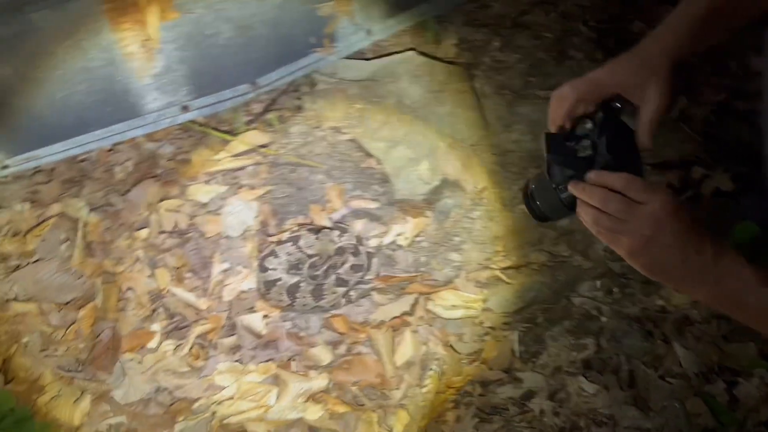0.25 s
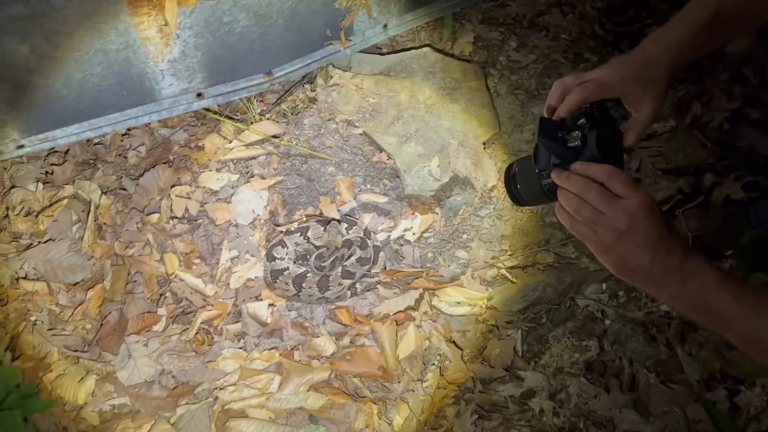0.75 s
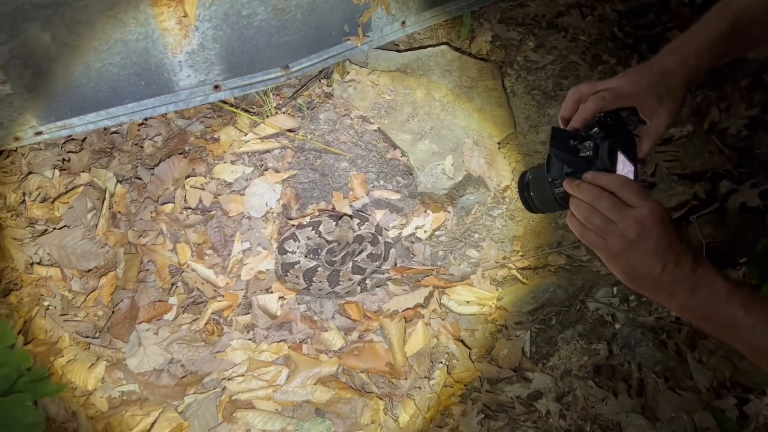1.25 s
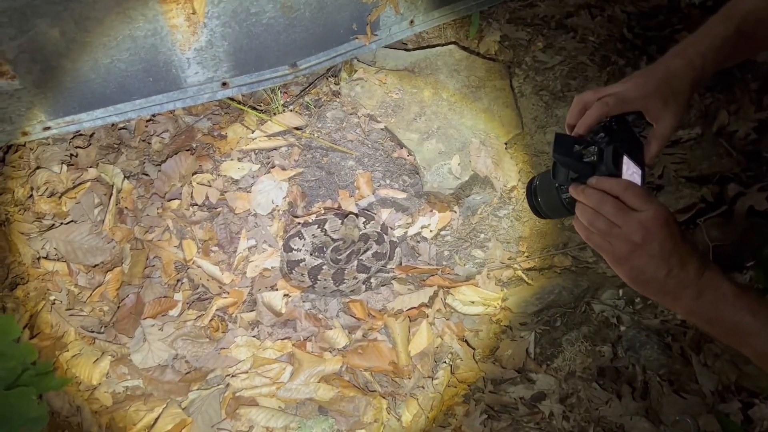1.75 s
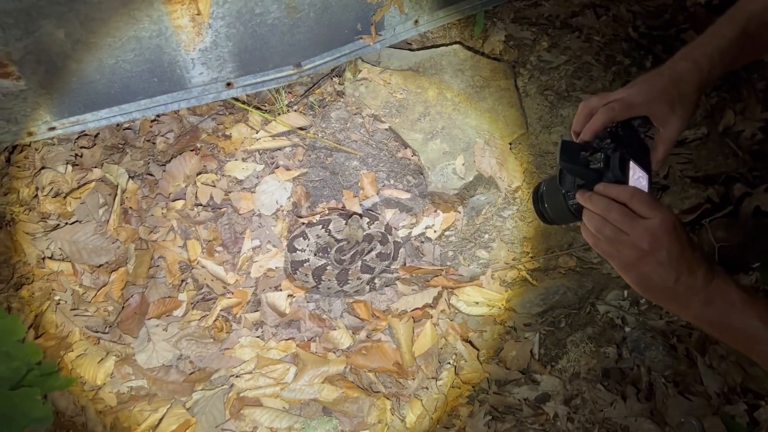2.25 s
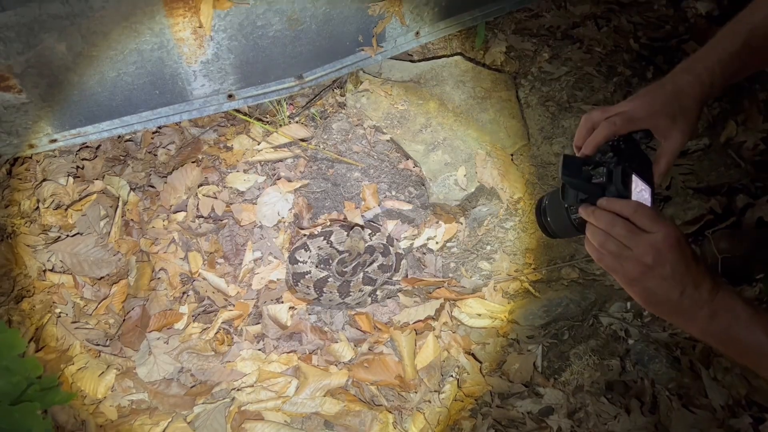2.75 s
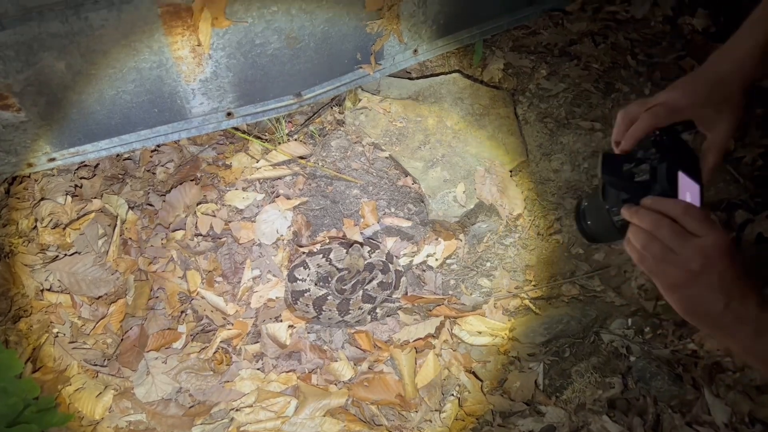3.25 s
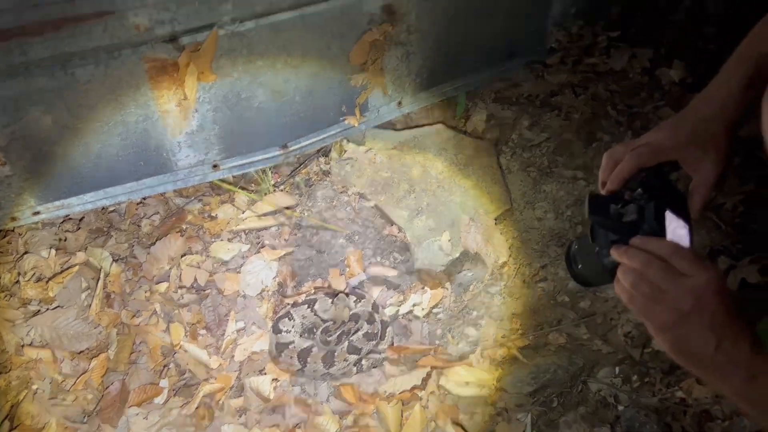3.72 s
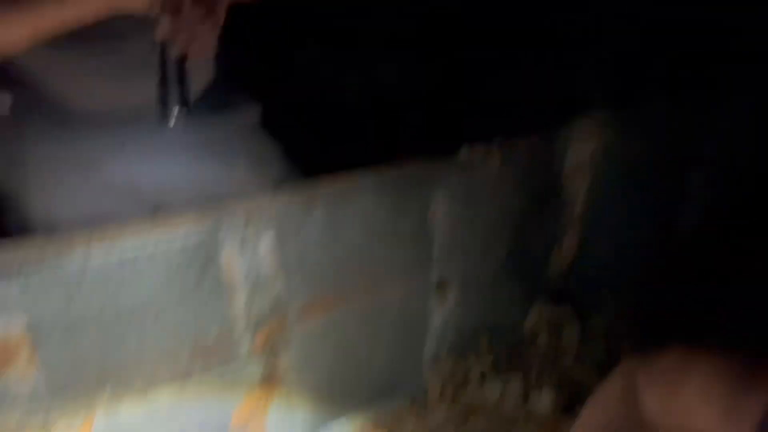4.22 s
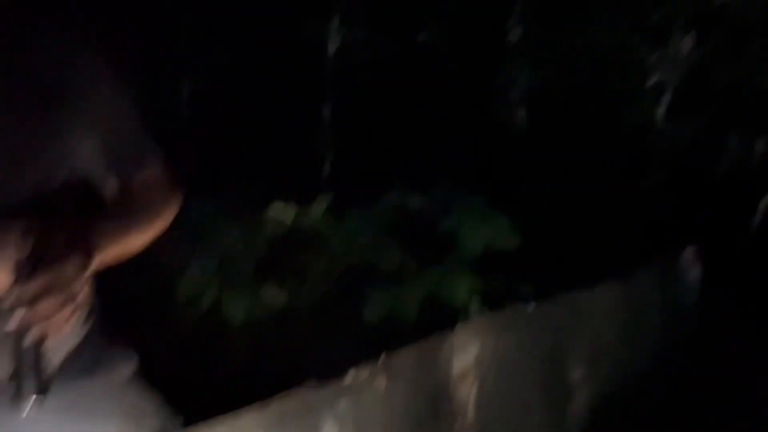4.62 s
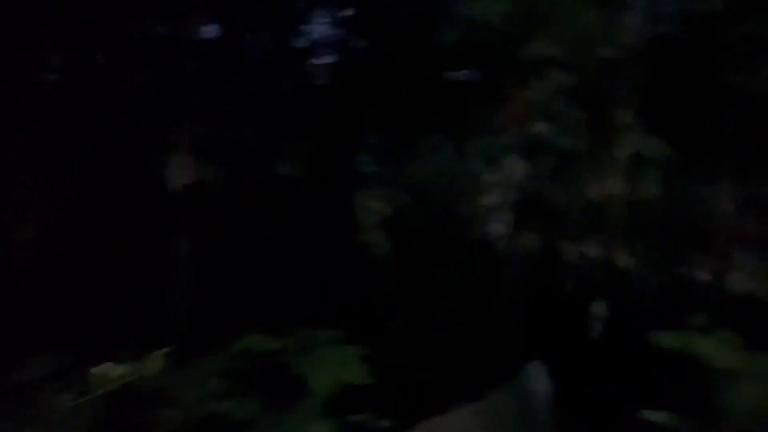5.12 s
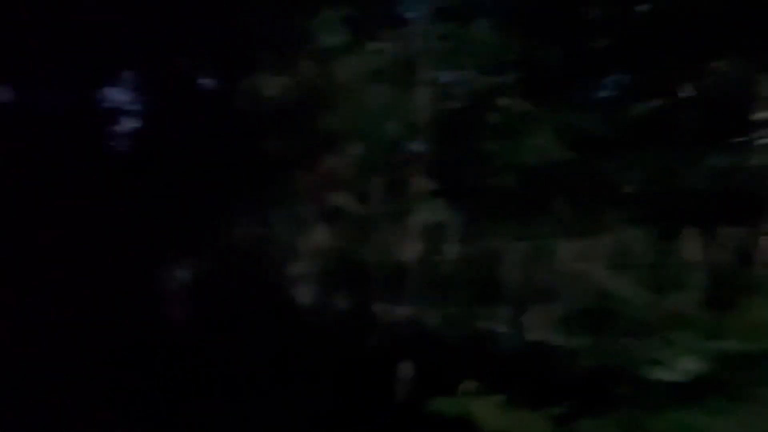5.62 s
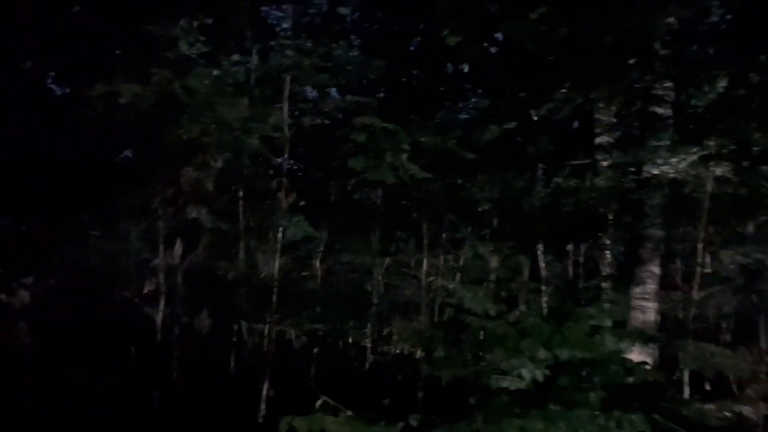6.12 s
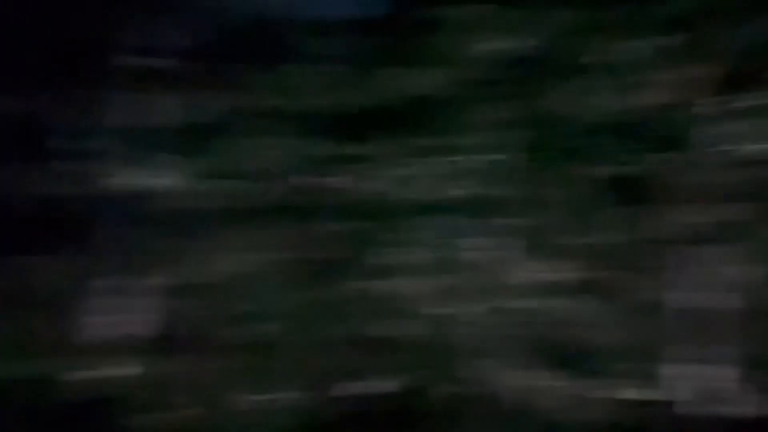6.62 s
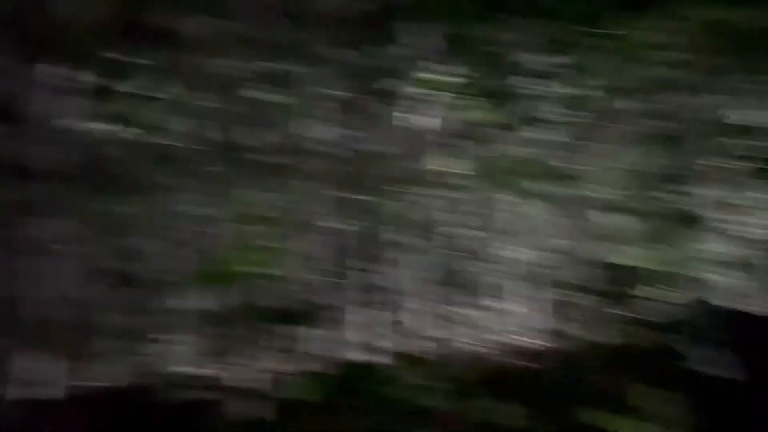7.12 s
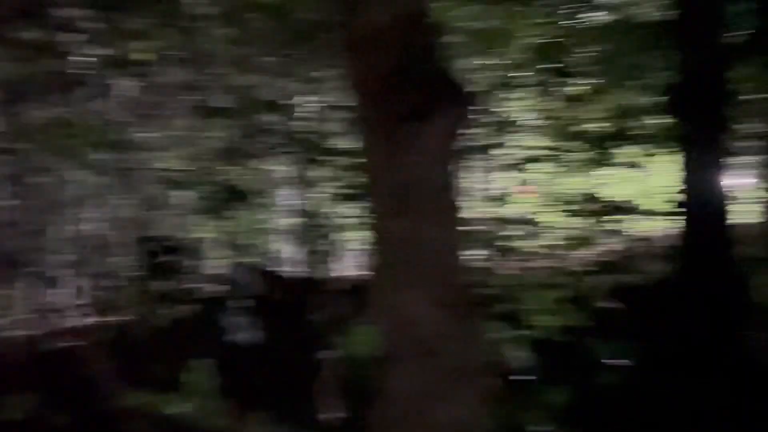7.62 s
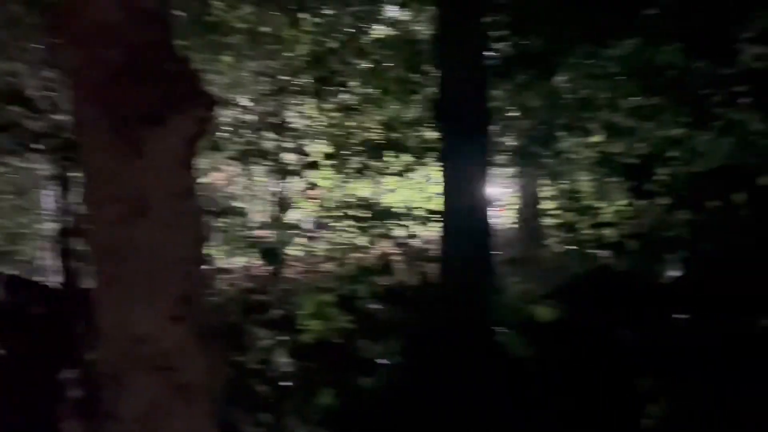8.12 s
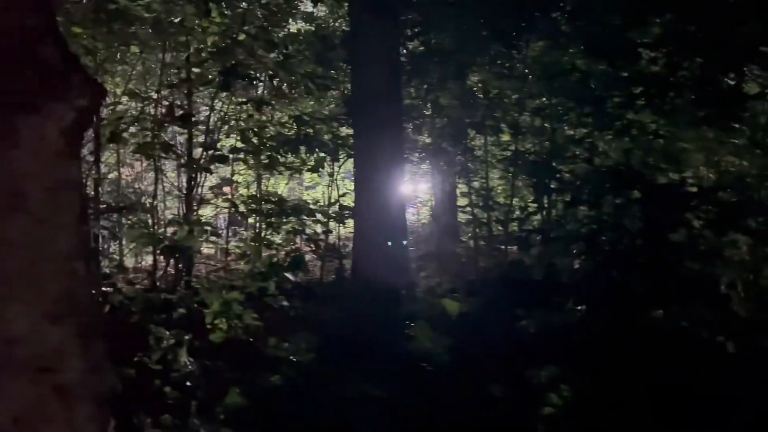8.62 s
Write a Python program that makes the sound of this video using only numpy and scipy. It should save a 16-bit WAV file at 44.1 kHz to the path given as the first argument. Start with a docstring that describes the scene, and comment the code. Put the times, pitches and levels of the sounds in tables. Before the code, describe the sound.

A rattlesnake shakes its tail in dry leaves, making a continuous, high, hissing buzz close to a hand-held microphone. About halfway through, the microphone turns away into the night woods, and the rattle shifts in tone and grows fainter without stopping. A distant engine idles with a low hum throughout. Faint wind brushes the microphone, and the plastic grip gives small creaks, mostly near the end.

```python
"""Rattlesnake at night

A rattlesnake buzzes in dry leaves below a hand-held camera, which turns away into the woods.
Its hollow tail segments clatter fifty times a second, and the colour at the two microphone ports
shifts with the turn. A far engine idles, light wind brushes the microphone, the plastic grip creaks."""
import sys
import numpy as np
from scipy import signal
from scipy.fft import rfft, irfft, next_fast_len
from scipy.io import wavfile
from scipy.ndimage import uniform_filter1d

SR = 44100
rng = np.random.default_rng(int(sys.argv[2]) if len(sys.argv) > 2 else 0)


def master(y):
    """Save y as 16-bit WAV."""
    cut = np.clip(np.atleast_2d(y).T, -1, 1)
    pcm = np.round(cut * 32767)  # scale
    wavfile.write(sys.argv[1], SR, pcm.astype(np.int16))


N = 390726


def amp(db):
    return 10 ** (np.asarray(db) / 20)


def unit_rms(x):
    return x / np.sqrt(np.mean(x ** 2) + 1e-20)


def at_hz(rows, hz):
    """Columns of a spectrum table, interpolated in log frequency."""
    row_hz, *columns = np.transpose(rows)
    return np.array([np.interp(np.log(hz + 1), np.log(row_hz + 1), c) for c in columns])


def at_time(rows, t):
    """Columns of a control table at times t."""
    row_s, *columns = np.transpose(rows)
    return [np.interp(t, row_s, c) for c in columns]


def stft(x, size):
    return signal.stft(x, SR, nperseg=size, noverlap=size * 3 // 4)


def istft(z, size):
    return signal.istft(z, SR, nperseg=size, noverlap=size * 3 // 4)[1][..., :N]


def drift(cutoff_hz):
    """Slow random wander, rms 1."""
    z = rfft(rng.standard_normal(N))
    hz = np.arange(len(z)) * SR / N
    return unit_rms(irfft(z / (1 + (hz / cutoff_hz) ** 4), N))


def patches(shape, bins, steps):
    """Random hills over frequency and time, rms 1."""
    hills = uniform_filter1d(rng.standard_normal(shape[::-1]).T, size=bins, axis=0)
    return unit_rms(uniform_filter1d(hills, size=steps, axis=1))


def ports(z, balance_db, lead_rad, coherence):
    """Stereo from two unrelated spectra: the right port shares part of the left."""
    coherence = np.clip(coherence, 0, 1)
    right = coherence * np.exp(1j * lead_rad) * z[0] + np.sqrt(1 - coherence ** 2) * z[1]
    return np.array([z[0], right / amp(balance_db)])


def camera_turn(t):
    """The hand swings the camera through five sides: 0 facing the snake, 4 turned away."""
    # Each row: start in seconds, length in seconds.
    swings = [(3.75, 0.52), (5.05, 0.51), (6.208, 0.66), (7.3, 0.51)]
    return sum(np.clip((t - start_s) / length_s, 0, 1) for start_s, length_s in swings)


def at_turn(per_side, turn):
    return np.interp(turn, range(len(per_side)), per_side)


def tail_clatter():
    """Dense dry clicks, loudest where segment knocks on segment; two unrelated click streams that share the
    same throb."""
    # Each row: time in seconds, shakes per second.
    shake_rate = [(0, 49.98), (1.75, 49.82), (3.85, 50.12), (4.9, 49.96), (6.15, 50.15), (7.7, 49.98),
                  (8.86, 49.98)]
    # Each row: place and spread as shares of a shake, centre in Hz, width in octaves, level in dB.
    knocks = [(0.079, 0.042, 3730, 0.11, 6), (0.73, 0.021, 4500, 0.12, 6.5), (0.22, 0.032, 5600, 0.073, 6),
              (0.074, 0.095, 8600, 0.28, 3), (0, 0.073, 9800, 0.062, 4), (0.35, 0.07, 14000, 0.25, 1.5),
              (0, 0.065, 12000, 0.075, 2), (.97, .1, 23000, 0.22, -6), (0.84, 0.11, 2550, 0.62, 0.5),
              (1, 0.16, 8700, 2.7, -4.5)]
    # Knock gain in dB for each side: echoes from the trees blur the throb.
    blur_db = [-0.25, 0.36, -0.47, -0.59, -2.5]
    clicks_per_s, click_spread_db, knock_spread_db, shell_t60_s = 12000, 1.5, 1.8, 0.0051
    hits = rng.random((2, N)) < clicks_per_s / SR
    sizes = np.minimum(rng.exponential(1, (2, N)), 4)
    clicks = hits * amp(click_spread_db * sizes) * rng.choice([-1, 1], (2, N))
    shell = rng.standard_normal((2, 300)) * amp(-60 * np.arange(300) / SR / shell_t60_s)
    n_fft = next_fast_len(N)
    smear = np.exp(1j * np.angle(rfft(shell, n_fft)))  # all-pass: spreads each click in time
    clicks = irfft(rfft(clicks, n_fft) * smear, n_fft)[:, :N]
    hz, t, z = stft(unit_rms(clicks), size=128)
    shakes = np.cumsum(at_time(shake_rate, t)[0]) * t[1]
    blur = amp(2 * at_turn(blur_db, camera_turn(t)))
    power = np.ones(z.shape[1:])
    scatter = rng.standard_normal((int(shakes[-1]) + 3, len(knocks), 2))  # no two shakes alike
    for k, (place, spread, centre_hz, width_oct, db) in enumerate(knocks):
        count = np.floor(shakes - place + .5).astype(int) + 1
        force, jitter = scatter[count, k].T
        offset = shakes - place + 1 - count + 0.046 * jitter
        pulse = amp(2 * (db + knock_spread_db * force)) * np.exp(-.5 * (offset / spread) ** 2)
        band = np.exp(-.5 * (np.log2((hz + 1) / centre_hz) / width_oct) ** 2)
        power += band[:, None] * pulse * blur
    return istft(z * np.sqrt(power / power.mean(1, keepdims=True)), size=128)


def rattle():
    """The tail's clatter and its echoes at the two ports of the turning camera."""
    # Each row: time in seconds, body level in dB, lean to the left in dB, treble level in dB.
    levels = [(0, -42.5, 4.5, -44), (3.7, -42.5, 4, -44.5), (3.95, -42, 2, -44.5), (4.25, -42.5, -0.5, -47),
              (4.7, -45.5, 4.5, -49), (5.05, -46.5, 3.5, -49), (5.45, -48.5, 3.8, -52),
              (5.9, -50, 1.5, -53), (6.3, -49, 5.5, -54.5), (6.5, -48, 9, -56.5), (6.85, -44.5, 9, -60.9),
              (7.15, -45.9, 7, -62), (7.65, -53.2, 7, -64), (7.85, -51.5, 6, -64.5), (8, -55, 2.5, -63),
              (8.86, -53.5, 4, -63.5)]
    # Body colour from five sides. Each row: frequency in Hz, left gain in dB, left over right in dB,
    # right lead in radians, coherence 0-1.
    front = [(1500, -22.9, 5.5, -0.04, 0.53), (2200, -18.6, 9.4, -1.1, 0.52),
             (3000, -11.7, 12.2, -1.5, 0.35), (3400, -5.4, 6.5, -0.22, 0.76), (3850, 2.2, 3.7, 0.01, 0.95),
             (4300, 1.7, 5.2, -0.01, 0.94), (4700, 1.5, 2.9, -0.0, 0.94), (4980, -6.7, 1.4, 0.01, 0.91),
             (5300, -0.6, 2.1, 0.28, 0.85), (5780, 2.8, 7.2, 0.79, 0.81), (6200, -0.8, 9.1, 1.69, 0.58),
             (6600, 0.3, 8.9, -0.52, 0.74), (7000, -1.5, 0.6, -0.05, 0.95), (7400, -3.7, 0.0, -0.0, 1.0)]
    quarter = [(1500, -22.4, 6.3, -1.9, 0.3), (2200, -18.6, 9.7, 0.4, 0.25), (2750, -15.2, 4.6, -0.1, 0.67),
               (3150, -7.9, 4.0, -0.6, 0.78), (3500, -2.2, 5.6, -0.4, 0.8), (3850, 1.5, 5.7, -0.5, 0.78),
               (4200, 3.6, 5.5, -0.5, 0.78), (4550, 2.7, 4.2, -0.7, 0.75), (4900, -1.1, 1.3, -0.3, 0.65),
               (5300, -5.3, -0.7, 0.2, 0.55), (5750, -3.0, 0.5, 1.0, 0.53), (6200, -4.1, 1.1, 0.8, 0.53),
               (6700, -2.4, 2.2, -0.0, 0.91), (7300, -3.3, 0.0, -0.0, 1.0)]
    side_on = [(1500, -19.1, 8.6, 3.1, 0.24), (2200, -16.7, 15.4, 0.1, 0.29), (2750, -15.7, 2.8, -0.2, 0.5),
               (3150, -10.1, 5.2, -2.4, 0.52), (3500, -4.7, 5.9, -1.9, 0.62), (3850, -2.4, 3.1, -1.4, 0.68),
               (4200, -4.0, -1.9, -1.4, 0.63), (4550, -5.7, -2.3, -0.1, 0.45), (4900, 0.1, 2.7, 0.5, 0.68),
               (5300, -0.8, 3.7, 1.0, 0.6), (5750, 2.6, 7.9, 1.6, 0.59), (6200, 3.2, 8.0, 1.5, 0.68),
               (6700, -0.7, 6.7, -0.2, 0.57), (7300, -2.2, 0.2, -0.1, 0.98)]
    back = [(1500, -23.2, 9.4, 2.9, 0.25), (2200, -34.4, -7.6, -2.6, 0.5), (2750, -30.3, -7.9, -2.6, 0.26),
            (3150, -19.6, -3.5, 0.2, 0.36), (3500, -7.7, 1.7, 0.2, 0.76), (3850, -2.1, 6.0, 0.0, 0.73),
            (4200, 2.5, 9.3, -0.1, 0.77), (4550, 1.4, 10.6, -0.2, 0.78), (4900, 1.6, 11.4, -0.2, 0.68),
            (5300, 0.9, 11.5, -0.6, 0.4), (5750, -2.0, 8.9, -1.0, 0.43), (6200, -4.0, 4.6, -1.1, 0.53),
            (6700, -9.7, 1.1, -2.4, 0.36), (7300, -13.7, -2.3, 0.1, 0.47)]
    behind = [(1500, -14.5, 2.9, -0.7, 0.19), (2200, -27.7, -5.4, -1.0, 0.33),
              (2750, -20.3, -1.9, -2.5, 0.55), (3150, -12.8, -0.8, -2.1, 0.43),
              (3500, -7.5, 1.8, -0.3, 0.13), (3850, -2.7, 3.0, -0.1, 0.42), (4200, 0.0, 5.6, -0.1, 0.5),
              (4550, 1.8, 6.6, -0.1, 0.66), (4900, 2.8, 6.8, -0.0, 0.62), (5300, 1.1, 6.8, 0.0, 0.56),
              (5750, -1.7, 5.9, 0.5, 0.24), (6200, -3.4, 2.5, 1.3, 0.14), (6700, -7.4, 1.5, -0.1, 0.28),
              (7300, -10.8, 0.0, -0.0, 0.94)]
    sides = [front, quarter, side_on, back, behind]
    # Pitch offset of the peaks in octaves for each side.
    side_oct = [0, .06, .07, -.2, -.1]
    # Each row: frequency in Hz, treble ripple in dB.
    treble_ripple = [(7000, 1.2), (7600, 0.2), (8200, 1.0), (8800, -2.1), (9200, -1.5), (9800, -2.7),
                     (10400, 0.5), (10900, -0.2), (11400, -2.3), (12000, -3.7), (12500, 0.6), (13800, 3.0),
                     (14700, 0.2), (15700, -1.4)]
    # The treble bands are by turns in step and opposed between the two channels. Each row: frequency in Hz,
    # right lead in half turns.
    twist = [(7900, 0), (9000, 1), (10050, 1), (11100, 2), (11900, 2), (13100, 3), (13850, 3), (14800, 4)]
    notch_hz, notch_width_hz, notch_db = 4960, 60, -7
    crossover_hz, min_treble_coherence, ground_gain = 7200, 0.09, 0.2

    hz, t, z = stft(tail_clatter(), size=1024)
    core = (hz > 3500) & (hz < 6500)
    hz = hz[:, None]
    body_db, lean_db, treble_db = at_time(levels, t)
    turn = camera_turn(t)
    # neighbouring sides blend, their peaks sliding in pitch
    slide_oct = at_turn(side_oct, turn)
    low_db, balance_db, lead_rad, low_coherence = sum(
        np.maximum(1 - abs(turn - k), 0) * at_hz(side, hz * 2 ** (side_oct[k] - slide_oct))
        for k, side in enumerate(sides))
    low_db += body_db - 12 * np.maximum(np.log2(1400 / (hz + 1)), 0)
    # an echo off sheet metal cancels one narrow band while the camera faces it
    facing = np.maximum(1 - 2 * turn, 0)
    low_db += notch_db * np.exp(-((hz - notch_hz) / notch_width_hz) ** 2) * facing
    lean_band = np.exp(-(np.log2((hz + 1) / 4800) / .5) ** 4)
    balance_db += (lean_db - balance_db[core].mean(0)) * lean_band

    ripple_db = at_hz(treble_ripple, hz)[0] * at_turn([1, .6, .4, .3, .3], turn)
    tilt_db_per_oct = at_turn([0, -3, -4.5, -3.5, -2.5], turn)
    high_db = treble_db + ripple_db + np.log2((hz + 1) / 11000) * tilt_db_per_oct
    twist_rad = np.pi * np.interp(hz, *np.transpose(twist))
    high_coherence = 1 - (1 - min_treble_coherence) * np.sin(twist_rad) ** 2
    high = np.clip((hz - crossover_hz) / 400 + .5, 0, 1)
    low = 1 - high

    # echoes off leaves and sheet metal comb thin, drifting streaks; the ground echo ripples evenly
    comb_db = 2.2 * patches(z.shape[1:], bins=2, steps=240)
    comb_db += 1.2 * patches(z.shape[1:], bins=8, steps=8)
    ground_delay_s = at_turn([0.0022, 0.001583, 0.00145, 0.0019, 0.00202], turn)
    comb_db += 20 * np.log10(abs(1 + ground_gain * low * np.exp(2j * np.pi * hz * ground_delay_s)))
    z = ports(z, low * balance_db, low * lead_rad + twist_rad, low * low_coherence + high * high_coherence)
    z *= amp(low * low_db + high * high_db) * unit_rms(amp(comb_db))
    return istft(z * np.sqrt(SR / 2000), size=1024)  # levels per kHz


def engine():
    """A far engine hunts around idle; through the trees its low orders waver differently at each port."""
    # Each row: time in seconds, firings per second.
    idle = [(0, 16.82), (.4, 16.47), (.76, 16.73), (1.1, 16.38), (1.72, 16.87), (2.05, 16.35),
            (2.78, 16.53), (3.04, 16.41), (3.4, 16.75), (3.8, 16.87), (4.3, 16.37), (4.7, 16.48),
            (5.6, 16.66), (6.3, 16.75), (7.09, 16.44), (7.4, 16.74), (7.85, 16.38), (8.5, 16.67),
            (8.86, 16.66)]
    # Each row: multiple of the firing rate, level in dB, phase in radians, waver in dB,
    # gain in dB per extra firing per second.
    orders = [(2, -63.5, 0, -1, 0), (3, -61.5, 0, 4, 5), (4, -49, 0, 1.1, -3.5), (5, -51.5, 0.29, 0.5, 7.5),
              (6, -64.5, -1.07, 1, 12), (7, -85, 3.5, 5, -2), (8, -85, -0.3, 3.6, 11),
              (10, -73.5, 2.5, 3, 9)]
    start_cycles = 0.93
    firing_hz = at_time(idle, np.arange(N) / SR)[0]
    angle = 2 * np.pi * (start_cycles + np.cumsum(firing_hz) / SR)
    out = np.zeros((2, N))
    for multiple, db, phase_rad, waver_db, db_per_hz in orders:
        sway_rad = 0.25 * drift(1.0)
        swell_db = waver_db * drift(2.3) + db_per_hz * (firing_hz - firing_hz.mean())
        lean_db = -5.5 + 2.5 * drift(2.7)
        for port, sign in enumerate((1, -1)):
            tone = np.sqrt(2) * np.cos(multiple * angle + phase_rad + sign * sway_rad)
            out[port] += amp(db + swell_db + sign * lean_db / 2) * tone
    return out


def night_air():
    """Low rumble and faint hiss in drifting patches, with a midrange rustle that swells and fades."""
    # Each row: frequency in Hz, noise density in dB, left over right in dB, coherence 0-1.
    spectrum = [(20, -92, 12, .7), (45, -75.5, 6, 0.4), (77, -69, 0.5, 0.8), (107.5, -80, 1, 0.63),
                (179, -92.5, -4, 0.86), (270, -106, 16, 0.2), (694, -106, -3, 0.08), (1100, -102, -2, 0),
                (1270, -100, -1.5, 0.3), (1580, -102, 5, 0.2), (2420, -103, -0.5, 0.56),
                (4000, -104, -4, 0), (6470, -110, 10, 0.1), (7500, -140, -10, .1)]
    # Each row: time in seconds, midrange gain in dB.
    rustle = [(0, 7), (.4, -6.5), (3.6, -6), (4.2, 4), (4.6, -2), (7.2, -3.5), (7.5, 3), (8, 2.5),
              (8.86, -11)]
    port_delay_s = 0.00019  # far sounds reach the right port later
    hz, t, z = stft(rng.standard_normal((2, N)), size=2048)
    hz = hz[:, None]
    db, balance_db, coherence = at_hz(spectrum, hz)
    midrange = np.exp(-(np.log2((hz + 1) / 800) / 0.64) ** 2)
    db = db + at_time(rustle, t)[0] * midrange + 2.5 * patches(z.shape[1:], bins=10, steps=8)
    z = ports(z, balance_db, -2 * np.pi * hz * port_delay_s, coherence)
    return istft(z * amp(db) * np.sqrt(SR / 2), size=2048)


def wind():
    """Gusts moan on the microphone: each rises, holds and drops back to the lull, fluttering all along."""
    # Each row: start in seconds, length in seconds, level in dB, moan pitch in Hz.
    gusts = [(.15, 0.37, -74.5, 333), (.95, 0.53, -75.5, 328), (1.565, 0.45, -74, 325),
             (1.95, 0.36, -74.5, 430), (2.673, 0.063, -60, 300), (2.833, 0.33, -76.5, 320),
             (3.348, 0.62, -70.5, 310), (4.024, 0.316, -69, 363), (4.688, 0.36, -74.5, 350),
             (5.34, 0.51, -75, 425), (5.89, 0.27, -75, 420), (6.457, .55, -74, 433),
             (7.888, 0.22, -74, 380), (8.514, 0.065, -62, 450)]
    # Each row: frequency in Hz, gain in dB, for a moan at reference_hz.
    colour = [(100, -8), (200, 1), (330, 3.5), (480, -2.5), (800, -21), (1500, -43), (3000, -33)]
    reference_hz, rise_s, fall_s, lull_db, flutter_db = 330, 0.042, 0.068, -83, 2.5
    hz, frame_s, z = stft(rng.standard_normal((2, N)), size=2048)
    starts_s, lengths_s, _, pitches_hz = np.transpose(gusts)
    moan_hz = np.interp(frame_s, starts_s + lengths_s / 2, pitches_hz)
    colour_db = at_hz(colour, hz[:, None] * reference_hz / moan_hz)[0]
    moan = istft(ports(z, balance_db=-5.0, lead_rad=0, coherence=0.17) * amp(colour_db), size=2048)
    t = np.arange(N) / SR
    strength = np.full(N, amp(lull_db))
    for start_s, length_s, db, _ in gusts:
        ramp = np.minimum((t - start_s) / rise_s, (start_s + length_s - t) / fall_s)
        strength += amp(db) * np.clip(ramp, 0, 1)
    return unit_rms(moan) * strength * amp(flutter_db * drift(17))


def grip_creaks():
    """Each creak is a short burst of slips that rings the plastic body."""
    # Each row: start in seconds, level in dB, left over right in dB, brightness in dB per octave.
    creaks = [(0.183, -58, 2, -1), (0.328, -59, 0, -1), (2.23, -63, 1, -2.5), (2.993, -54.5, -1, 0),
              (4.113, -59, 4.5, -6), (4.149, -59, 3, -2.5), (4.976, -57, -0.5, 0), (7.534, -59, 0, 3),
              (7.581, -46.5, 0, 3), (7.772, -54.5, 3, -2.5), (7.836, -61, 0.5, -6), (7.882, -56, 5, 3),
              (7.902, -56, -3, 10), (8.13, -59, -2, -8), (8.143, -60, -1, -2.5), (8.178, -59, -3, -8),
              (8.195, -67, -0.5, -2.5), (8.212, -60, -2, -5), (8.233, -63, -1, -2.5), (8.273, -61, -1, -4),
              (8.522, -57, -0.5, -2.5)]
    # Each row: frequency in Hz, gain in dB, t60 in seconds.
    body_modes = [(580, -28, 0.018), (790, -5, 0.025), (945, -7, .018), (1260, 13.5, 0.018),
                  (1424, 2.5, 0.023), (1760, 3, .015), (2040, 4.5, 0.015), (2500, -1, 0.016),
                  (4200, -15, .008)]
    attack_s, slip_t60_s = 0.00056, 0.051
    out, t = np.zeros((2, N + 4000)), np.arange(2000) / SR
    slips = rng.standard_normal((len(creaks), 2, len(t))) * (1 - np.exp(-t / attack_s))
    for (start_s, db, pan_db, db_per_oct), slip in zip(creaks, slips):
        ring = sum(amp(mode_db + db_per_oct * np.log2(hz / 1200) - 60 * t / t60_s)
                   * np.sin(2 * np.pi * hz * t) for hz, mode_db, t60_s in body_modes)
        burst = (slip + 0.48 * slip[::-1]) * amp(-60 * t / slip_t60_s)
        creak = signal.oaconvolve(burst, ring[None], axes=1)
        creak *= 1.87 * amp(db + np.array([[pan_db], [-pan_db]]) / 2) / abs(creak).max()
        out[:, round(start_s * SR):][:, :creak.shape[1]] += creak
    highpass = signal.butter(2, 450, "high", fs=SR, output="sos")  # small body, no bass
    return signal.sosfilt(highpass, out[:, :N])


def scene():
    return rattle() + engine() + night_air() + wind() + grip_creaks()


def record(dry):
    """Steep low-pass band limit."""
    edge_hz = 15850
    lowpass = signal.firwin(511, edge_hz, window=("kaiser", 9), fs=SR)
    return signal.oaconvolve(dry, lowpass[None], "same")


dry = scene()
out = record(dry)
master(out)
```